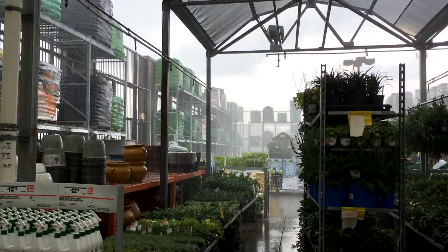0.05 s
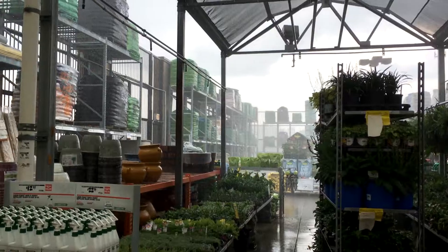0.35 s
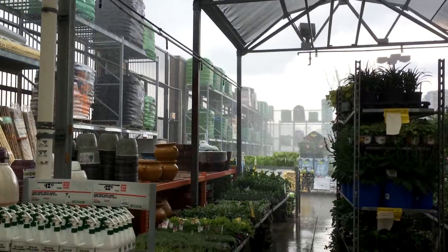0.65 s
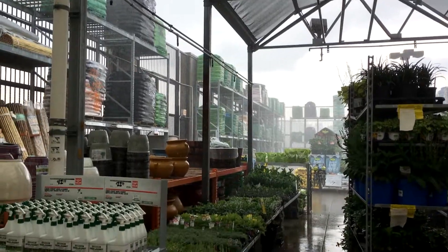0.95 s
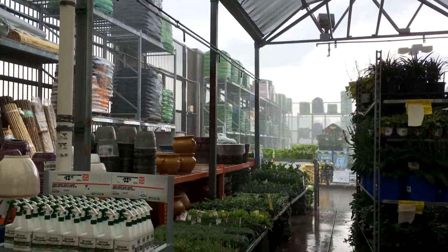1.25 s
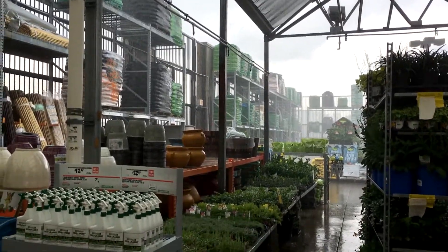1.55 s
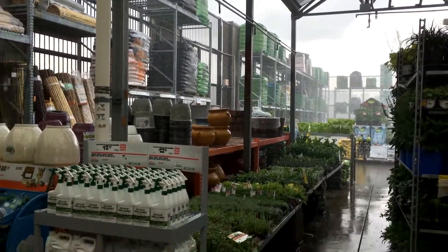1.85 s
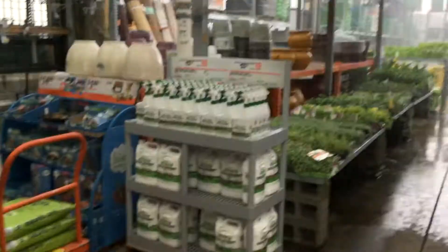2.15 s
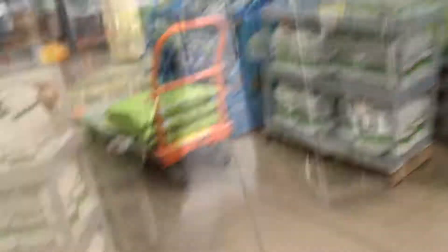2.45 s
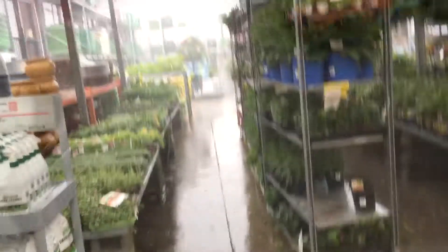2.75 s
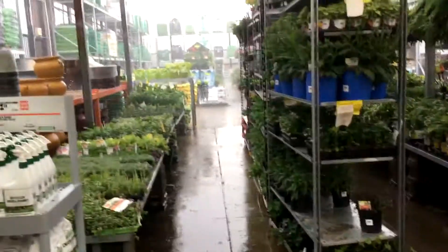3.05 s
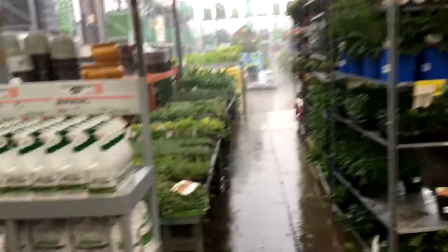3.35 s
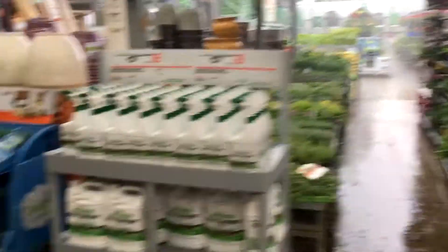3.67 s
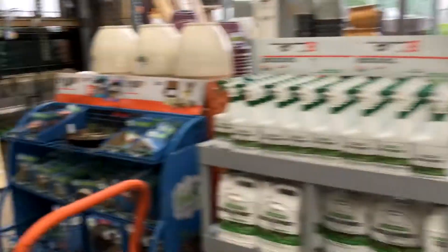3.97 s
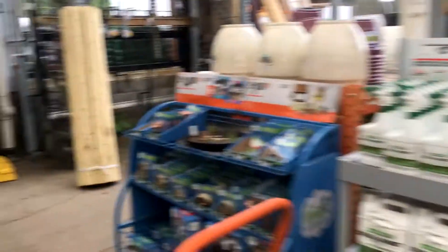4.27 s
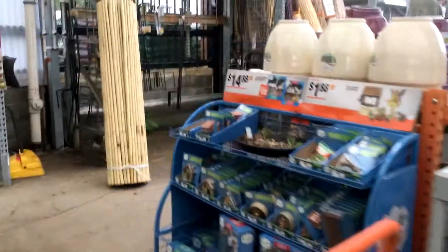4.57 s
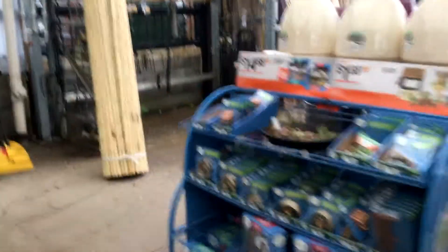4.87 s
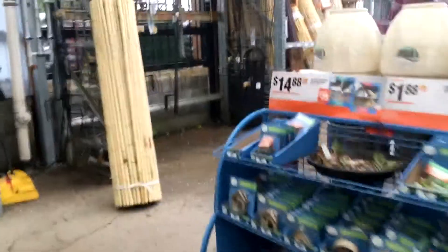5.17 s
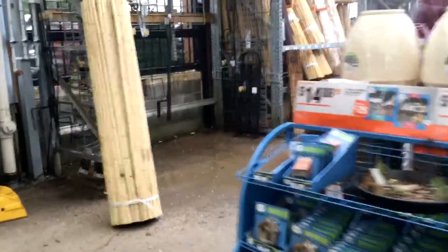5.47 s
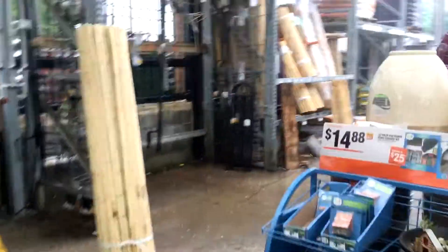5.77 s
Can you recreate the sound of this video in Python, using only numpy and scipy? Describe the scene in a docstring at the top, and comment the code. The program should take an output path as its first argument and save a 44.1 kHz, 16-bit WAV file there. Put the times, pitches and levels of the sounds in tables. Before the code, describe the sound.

Heavy rain fades in on the canopy roof of a garden center, heard from underneath. Countless drops blur into a steady roar of low rumble, rattling roof sheets and hissing spray, with a few sharp close splats and dull thuds. After about two seconds the microphone swings toward the roof, and the downpour turns louder and brighter and stays that way.

```python
"""Downpour on the canopy roof of a garden centre, heard from underneath on one microphone.
Thousands of drops a second make the wide bays boom, the roof sheets rattle and the water spray;
the hall blurs them into a roar. A few close splats and heavy thuds stand out; gusts add rain.
The sound fades in, then turns louder and brighter as the microphone swings round to the roof."""
import sys
import numpy as np
from scipy import signal
from scipy.fft import rfft, irfft
from scipy.io import wavfile

SR = 44100
rng = np.random.default_rng(int(sys.argv[2]) if len(sys.argv) > 2 else 0)


def transcribe(signal):
    """Save signal, clipped to [-1, 1], as a 16-bit WAV file at the path in sys.argv[1]."""
    frames = np.atleast_2d(signal).T
    limited = np.clip(frames, -1, 1)
    pcm = np.round(limited * 32767).astype(np.int16)
    wavfile.write(sys.argv[1], SR, pcm)


N = 261072
TIME_S = np.arange(N) / SR

# Roof bay spectrum. Each row: frequency in Hz, relative level in dB.
BOOM_SPECTRUM = [(15, -42), (26, -28), (42, -11), (62, -8), (80, -3), (110, 1), (155, -0.9), (205, -3),
                 (270, -5.5), (350, -8), (480, -14.5), (900, -58.5)]
# Sheet spectrum, on axis. Each row: frequency in Hz, relative level in dB.
RATTLE_ON_AXIS_SPECTRUM = [(250, -18.5), (430, -4.5), (620, -0.5), (850, -2.5), (1450, 0.5), (2100, -1.25),
                           (3100, -4.5), (3900, -9), (4550, -9.5), (4850, -12), (5600, -29), (8000, -68)]
# Sheet spectrum, off axis. Each row: frequency in Hz, relative level in dB.
RATTLE_OFF_AXIS_SPECTRUM = [(250, -13.5), (430, 1), (620, 6), (1000, 4), (1450, 2.5), (2100, -5.5),
                            (3100, -11.5), (3900, -12.5), (4550, -11.5), (4900, -5), (5600, -32),
                            (8000, -66)]
# Spray hiss as coloured by the microphone, with peaks near 6 and 9 kHz.
# Each row: frequency in Hz, relative level in dB.
MIC_COLOURED_HISS = [(4500, -32), (4950, -10), (5350, 0.5), (5800, 1), (6900, 0.9), (7500, -5.5),
                     (8100, -6.5), (9000, -3.5), (9700, -4.5), (10400, -12), (11000, -10.5), (13000, -15),
                     (15400, -18.5), (17000, -18)]
# Close drops. Each row: start in seconds, level in dB, lower band edge in Hz, T60 in seconds.
CLOSE_SPLATS = [(0.453, -27, 8880, .015), (0.847, -18, 8000, .025), (0.89, -16, 5640, .07),
                (1.253, -26, 9000, .025), (1.292, -27, 9000, .06), (1.907, -25, 10000, .02),
                (1.95, -26, 8000, .025), (2.322, -15, 5070, 0.064), (2.993, -20, 9000, .02),
                (4.808, -19, 9000, .03)]
# Heavy blows on a bay. Each row: start in seconds, relative level in dB.
BAY_BLOWS = [(0.535, -14.5), (1.07, -12), (1.515, -15), (1.795, -10), (2.996, -9), (4.12, -9), (5.13, -13)]
# Bay resonances. Each row: frequency in Hz, relative level in dB, T60 in seconds.
BAY_RESONANCES = [(86, -8, 0.11), (117, -1.5, 0.21), (150, -2.5, 0.22), (202, -2, 0.14), (234, -11, 0.05)]
# Gusts. Each row: centre in seconds, length in seconds, rattle lift in dB, spray lift in dB.
RAIN_GUSTS = [(0.89, 0.18, 1.9, 3), (1.245, 0.14, 2.5, 2), (3.25, 0.24, 1.3, 0)]
# Microphone swing to the roof. Each row: time in seconds, share of the turn from 0 to 1.
MIC_TURN = [(2.19, 0), (2.34, 0.4), (2.65, 0.78), (3.05, 0.99), (5.92, 1)]

# Level facing the roof, loss turned away: bass bends round, treble is shaded.
BOOM_DB, BOOM_SHADE_DB = -21, 4
RATTLE_DB, RATTLE_SHADE_DB = -17.5, 7
SPRAY_DB, SPRAY_SHADE_DB = -19.5, 8.5
SPRAY_GROWTH_DB_PER_S = 0.2741
ON_AXIS_SHARE_BEFORE_TURN = 0.52
HALL_T60_S = 2.2
FADE_START_S, FADE_TAU_S = 0.12, 0.61
CUTOFF_HZ = 15750


def from_db(db):
    """Decibels to gain."""
    return 10 ** (np.asarray(db) / 20)


def unit_rms(x):
    """Scale to rms 1."""
    return x / np.sqrt(np.mean(x ** 2) + 1e-20)


def drift(corner_hz):
    """Slow random wander, rms about 1."""
    hop, warmup = 40, 2000
    pole = np.exp(-2 * np.pi * corner_hz * hop / SR)
    noise = rng.standard_normal(N // hop + warmup + 2)
    slow = signal.lfilter([1], [1, -2 * pole, pole * pole], noise)[warmup:]
    return np.interp(np.arange(N) / hop, np.arange(len(slow)), unit_rms(slow))


def colour(x, spectrum):
    """Minimum-phase filter with the given spectrum; rms 1."""
    hz, db = np.transpose(spectrum)
    grid_hz = np.maximum(np.fft.rfftfreq(N, 1 / SR), 1)
    gain = from_db(np.interp(np.log(grid_hz), np.log(hz), db))
    cepstrum = irfft(np.log(gain), N)
    cepstrum[1:N // 2] *= 2
    cepstrum[N // 2 + 1:] = 0
    return unit_rms(irfft(rfft(x) * np.exp(rfft(cepstrum)), N))


def roof_boom():
    """Wide bays sum countless blows into a low, uneven rumble."""
    level_db = BOOM_DB - BOOM_SHADE_DB * mic_turned_away()
    flurry_db = 0.35 * drift(corner_hz=7.2)
    return from_db(level_db + flurry_db) * colour(rng.standard_normal(N), BOOM_SPECTRUM)


def diffuse_decay(sizes, t60_s):
    """Drops hit different spots, so share no pitch: their energies add and decay; rms 1."""
    pole = from_db(-120 / (t60_s * SR))
    energy, _ = signal.lfilter([1 - pole], [1, -pole], sizes ** 2 + 1e-18, zi=[np.mean(sizes ** 2)])
    return unit_rms(np.sqrt(energy) * rng.standard_normal(N))


def drop_impacts(per_s, spread_db, ring_t60_s, tick_db, hall_db):
    """Drops of random size, each a tick, a brief ring and a hall tail; rms 1."""
    landed = rng.random(N) < per_s / SR
    sizes = landed * from_db(spread_db * np.minimum(rng.exponential(1, N), 4))
    ticks = from_db(tick_db) * unit_rms(sizes * rng.choice([-1, 1], N))
    rings = diffuse_decay(sizes, ring_t60_s)
    hall = from_db(hall_db) * diffuse_decay(sizes, HALL_T60_S)
    return unit_rms(ticks + rings + hall)


def drop_pings(low_hz, high_hz, spread_db, t60_cycles, count, length_samples=2000):
    """Big drops ring at random pitches, the high ones harder and shorter; rms 1."""
    time_draw, pitch_draw, size_draw = rng.random((count, 3)).T[:, :, None]
    hz = low_hz * (high_hz / low_hz) ** pitch_draw
    strength = hz * from_db(spread_db * np.minimum(-np.log(1 - size_draw), 3))
    cycles = hz * TIME_S[:length_samples]
    rings = strength * np.sin(2 * np.pi * cycles) * from_db(-60 * cycles / t60_cycles)
    indices = (time_draw * N).astype(int) + np.arange(length_samples)
    return unit_rms(np.bincount(indices.ravel(), rings.ravel(), N)[:N])


def roof_rattle(gust_db):
    """Drops ring the sheets briefly, big ones with a pitch, in quick flurries."""
    patter = drop_impacts(per_s=3500, spread_db=1.5, ring_t60_s=0.022, tick_db=-8.5, hall_db=4.5)
    pings = drop_pings(low_hz=804.6, high_hz=4790, spread_db=1.0, t60_cycles=72, count=3000)
    drops = patter + from_db(-13.5) * pings
    away = mic_turned_away()
    off_axis_share = away * (1 - ON_AXIS_SHARE_BEFORE_TURN)
    on_axis = (1 - off_axis_share) * colour(drops, RATTLE_ON_AXIS_SPECTRUM)
    off_axis = off_axis_share * colour(drops, RATTLE_OFF_AXIS_SPECTRUM)
    level_db = RATTLE_DB - RATTLE_SHADE_DB * away
    flurry_db = 0.38 * drift(corner_hz=9.4)
    return from_db(level_db + gust_db + flurry_db) * (on_axis + off_axis)


def spray(gust_db):
    """Bursting drops: fine hiss from the whole roof, sparse sharp ticks from nearby."""
    far = drop_impacts(per_s=7000, spread_db=0.5, ring_t60_s=0.0062, tick_db=1.5, hall_db=6.0)
    near = drop_impacts(per_s=140, spread_db=3.0, ring_t60_s=0.0056, tick_db=-7, hall_db=-12)
    hiss = colour(far, MIC_COLOURED_HISS)
    tick_band = signal.butter(2, [8500, 14000], "band", fs=SR, output="sos")
    ticks = from_db(-16.5) * signal.sosfilt(tick_band, near)
    level_db = SPRAY_DB + SPRAY_GROWTH_DB_PER_S * TIME_S - SPRAY_SHADE_DB * mic_turned_away()
    flurry_db = 0.61 * drift(corner_hz=17)
    return from_db(level_db + gust_db + flurry_db) * (hiss + ticks)


def splats():
    """Each close drop bursts into a short, bright splash."""
    out = np.zeros(N + SR)
    for start_s, level_db, low_hz, t60_s in CLOSE_SPLATS:
        band = signal.butter(2, [low_hz, min(1.8 * low_hz, .45 * SR)], "band", fs=SR, output="sos")
        burst = rng.standard_normal(SR) * from_db(-60 * TIME_S[:SR] / t60_s)
        start = round(start_s * SR)
        out[start:start + SR] += from_db(level_db) * signal.sosfilt(band, burst)
    return out[:N]


def ring_mode(clicks, hz, t60_s):
    """A unit click starts a decaying sine of height 1."""
    radius = from_db(-60 / (t60_s * SR))
    step_rad = 2 * np.pi * hz / SR
    feedback = [1, -2 * radius * np.cos(step_rad), radius * radius]
    return signal.lfilter([0, np.sin(step_rad)], feedback, clicks + 1e-18)


def thuds():
    """Heavy blows ring a bay's low modes at random strengths; adjacent modes swing opposite ways."""
    start_s, blow_db = np.transpose(BAY_BLOWS)
    starts = np.round(start_s * SR).astype(int)
    out = np.zeros(N)
    for k, (hz, mode_db, t60_s) in enumerate(BAY_RESONANCES):
        scatter_db = rng.normal(0, 2.65, len(starts))
        clicks = np.zeros(N)
        clicks[starts] = from_db(blow_db + mode_db - 7.0 + scatter_db)
        out += ring_mode(clicks, hz, t60_s) * (-1) ** k
    return out


def gusts_db():
    """Gusts throw extra rain on the roof in smooth swells: (rattle lift, spray lift)."""
    centre_s, length_s, rattle_db, spray_db = np.transpose(RAIN_GUSTS)[:, :, None]
    arch = np.cos(np.pi * np.clip((TIME_S - centre_s) / length_s, -.5, .5)) ** 2
    return (rattle_db * arch).sum(axis=0), (spray_db * arch).sum(axis=0)


def mic_turned_away():
    """Microphone aim: 1 turned away, 0 facing the roof."""
    return 1 - np.interp(TIME_S, *np.transpose(MIC_TURN))


def scene():
    """All the rain at one microphone, same in both channels."""
    rattle_gust_db, spray_gust_db = gusts_db()
    rain = roof_boom() + roof_rattle(rattle_gust_db) + spray(spray_gust_db) + thuds() + splats()
    return np.stack([rain, rain])


def record(dry):
    """Exponential fade-in from silence, soft clip, steep low-pass."""
    fade = 1 - np.exp(-np.maximum(TIME_S - FADE_START_S, 0) / FADE_TAU_S)
    rounded = 1.6 * np.tanh(dry * fade / 1.6)
    lowpass = signal.ellip(12, .1, 90, CUTOFF_HZ, fs=SR, output="sos")
    return signal.sosfilt(lowpass, rounded)


dry = scene()
out = record(dry)
transcribe(out)
```